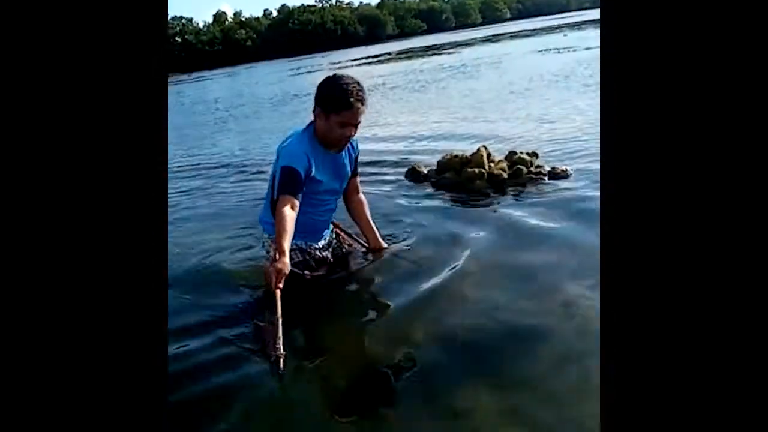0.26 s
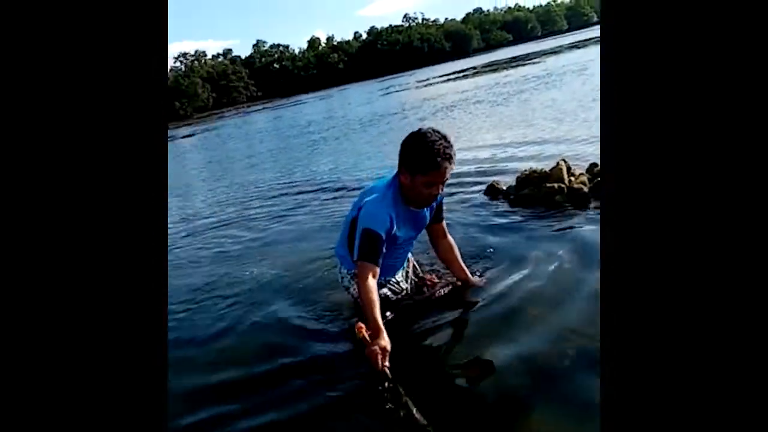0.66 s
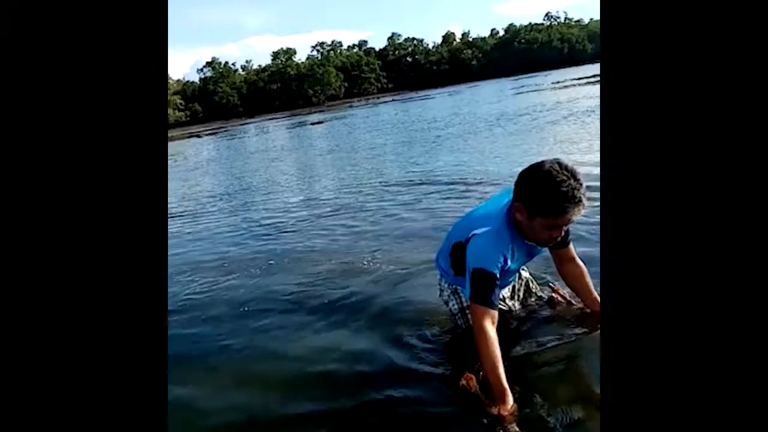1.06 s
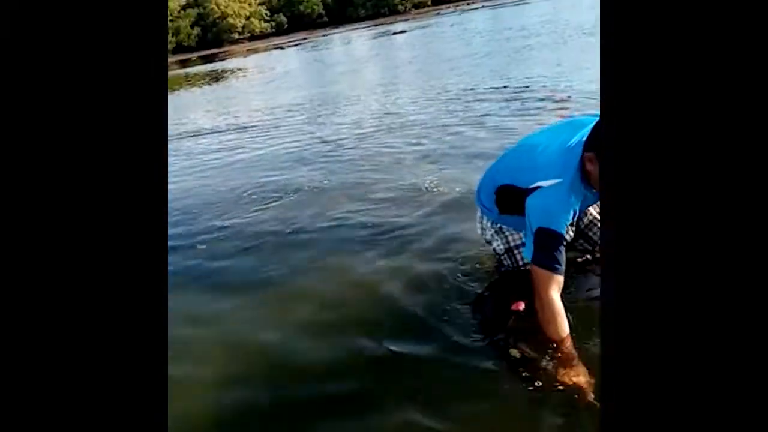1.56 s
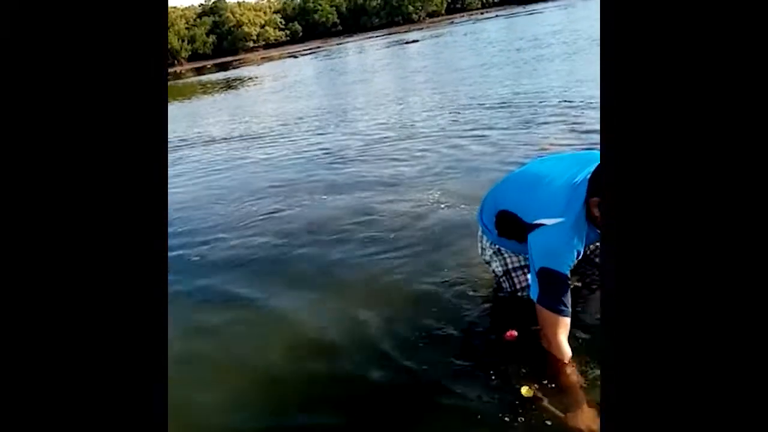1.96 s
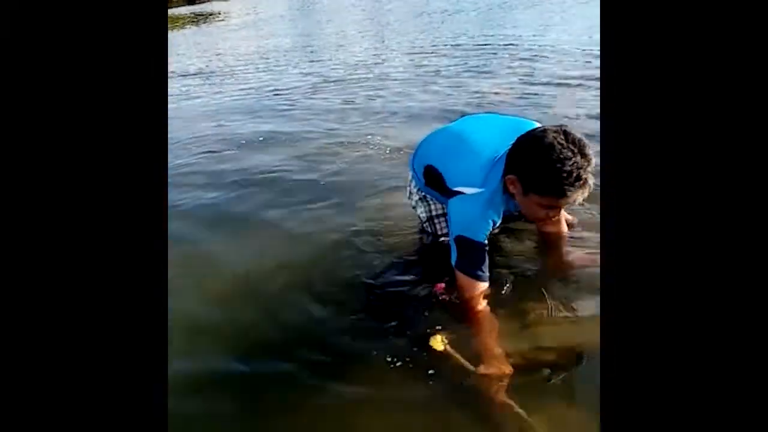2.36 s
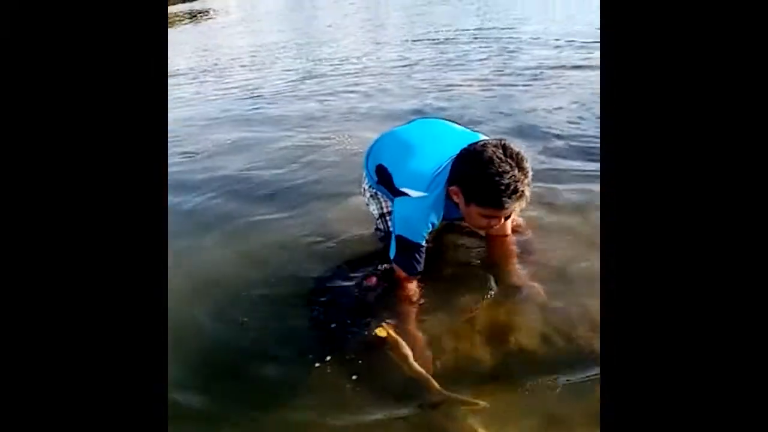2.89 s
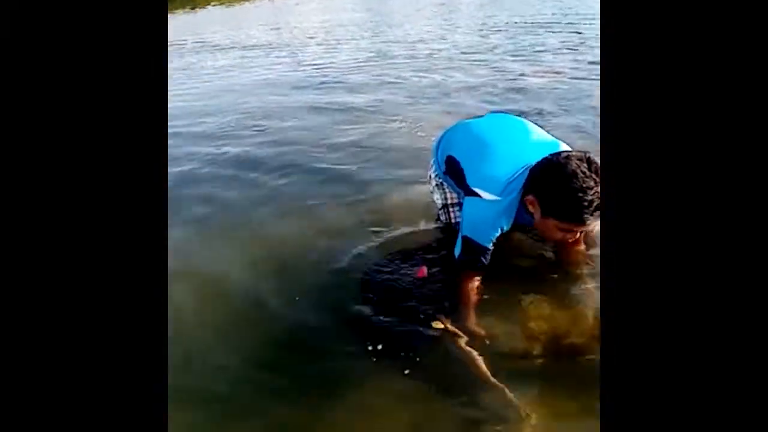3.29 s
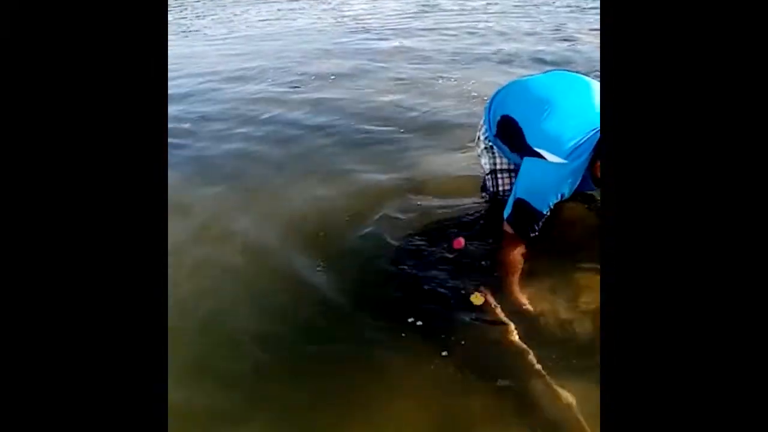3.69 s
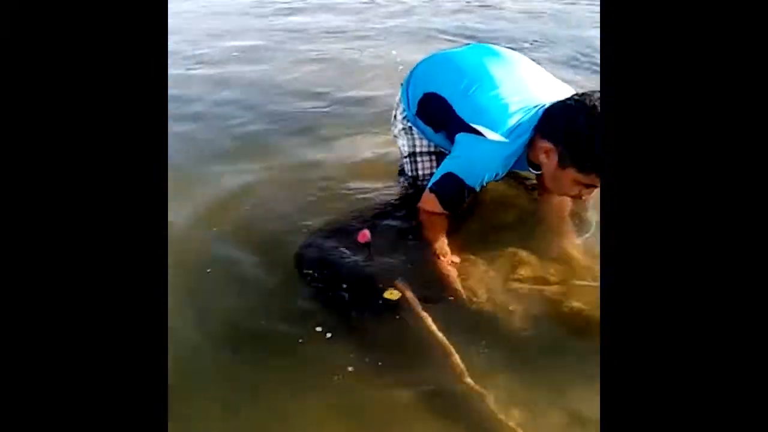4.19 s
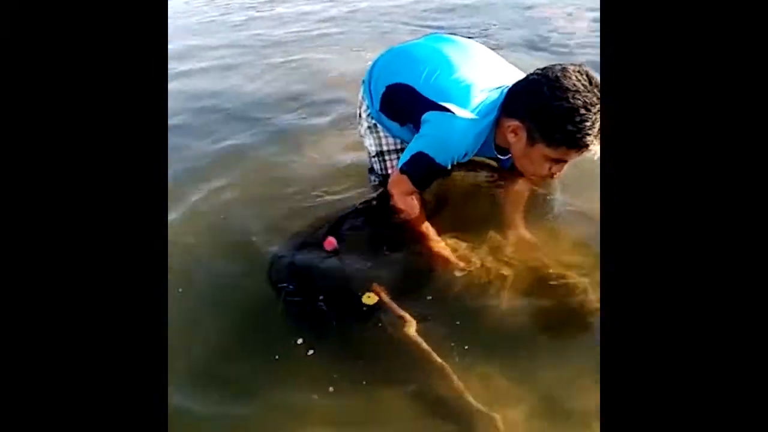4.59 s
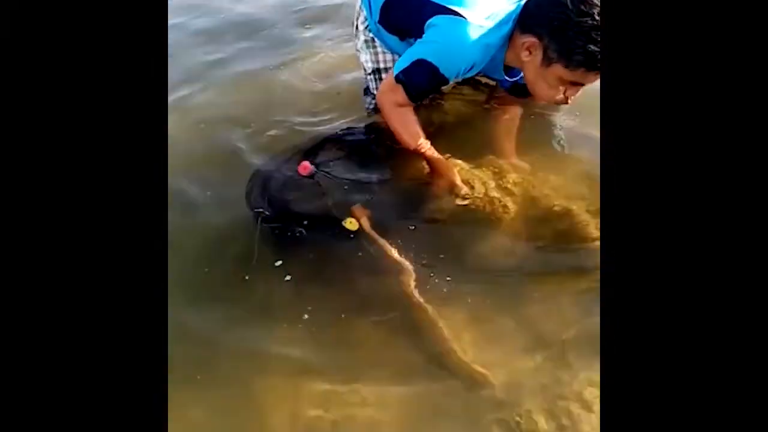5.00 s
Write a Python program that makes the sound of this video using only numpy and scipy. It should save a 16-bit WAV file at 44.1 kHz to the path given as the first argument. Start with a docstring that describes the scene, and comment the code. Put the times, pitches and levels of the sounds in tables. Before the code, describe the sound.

Outdoors on calm, shallow sea, with a soft, low bed of moving air and distant ripples. Wind buffets the microphone with low rumbles and thumps in the first 0.2 seconds, again lightly near 1.4 and 2.7. Close by on the right, someone wades: small swishes at the start, a bubbly slosh at 0.8 with drips and a hollow glug just after, then a couple of faint stone taps at 1.3. The strongest splash comes around 1.8 to 2.3, with fizz, bright drops and a cluster of rising bubble notes. It then quiets, with faint knocks near 3 and a short slosh at 3.4. From 3.6 onward stones clack sharply underwater, one after another, while pebbles grate and sandy grit hisses in uneven scoops, fullest from 4.2 to 5. Dull slaps and hollow gulps fall among them. A last knock and fading gravel end it.

```python
"""Someone wades in calm, waist-deep sea, then bends and scoops stones into a net under the surface.
Strokes of arms and legs stir up clouds of ringing bubbles, fizz and drips. Stones clack as short noise
bursts with a ring, gravel grates in dense clicks, and water gulps over the stones with a slap and a hollow note.
All this is close by on the right, over a soft bed of moving air and far ripples, while a light breeze
buffets the microphone ports with rumble and thumps."""
import sys
import numpy as np
from scipy import signal
from scipy.fft import rfft, irfft, next_fast_len
from scipy.io import wavfile
from scipy.ndimage import uniform_filter1d

SR = 44100
rng = np.random.default_rng(int(sys.argv[2]) if len(sys.argv) > 2 else 0)


def int16_out(signal):
    """Quantize to a 16-bit WAV file."""
    q = np.round(np.clip(np.atleast_2d(signal).T, -1, 1) * 32767)
    wavfile.write(sys.argv[1], SR, q.astype(np.int16))


N = 231432
TIME = np.arange(N) / SR

# Limbs or their wakes pushing through the water. Each row: time of the height in seconds, spray level
# in dB, gurgle level in dB (both before the lift in slosh), swell in seconds, settling in seconds.
STROKES = [(0.01, -61.5, -59, 0.09, 0.048), (0.14, -57, -68, .045, .035), (0.48, -66, -90, 0.36, 0.26),
           (0.801, -50, -53.5, 0.14, 0.22), (1.13, -60, -72, 0.16, 0.22), (1.74, -59.5, -79, 0.094, 0.075),
           (1.992, -43, -50, 0.12, 0.16), (2.209, -48.5, -54, 0.065, 0.078), (2.99, -60.5, -65, 0.59, 0.13),
           (3.179, -56, -63.5, 0.03, .09), (3.378, -47.5, -61, 0.076, 0.15)]
# Stones knocking together. Each row: time in seconds, peak in dB before a 6.5 dB lift, ring in Hz,
# treble in dB before a 14 dB lift.
KNOCKS = [(1.3031, -39, 1570, -32), (1.3631, -38, 1550, -18), (2.801, -39.5, 1510, -22.5),
          (3.0025, -38.5, 1530, -11), (3.1767, -38.5, 2150, -10.5), (3.235, -39, 2110, -13),
          (3.4164, -34, 1660, -18), (3.5818, -21, 1800, -15.5), (3.6215, -32, 1610, -4),
          (3.6646, -34.5, 1650, -32), (3.7185, -34, 1880, -4), (3.7967, -32.5, 1740, -10),
          (3.8288, -29.5, 1750, -19), (3.8383, -22, 1990, -21), (3.9048, -31, 1490, -11),
          (3.927, -26, 1600, -26.5), (3.9436, -24.5, 1400, -51), (4.064, -27, 1590, -14.5),
          (4.146, -33, 1700, -27), (4.1816, -22.5, 1350, -50), (4.2091, -25, 1500, -22),
          (4.255, -29.5, 1710, -10), (4.3076, -29.5, 1470, -10.5), (4.349, -27, 1480, -17),
          (4.4485, -29.5, 2040, -15), (4.4929, -22.5, 1360, -16.5), (4.6186, -24, 1750, -18.5),
          (4.6663, -30.5, 1770, -24.5), (4.7062, -20.5, 1660, -14.5), (4.7648, -20.5, 1710, -17.5),
          (4.8349, -24.5, 1590, -20.5), (4.8699, -30.5, 1720, -13.5), (4.9006, -23, 1610, -13.5),
          (5.0437, -18.5, 1740, -18.5), (5.2424, -30.5, 1710, -25)]


def from_db(db):
    """Turn decibels into gain."""
    return 10 ** (np.asarray(db) / 20)


def rms_one(x):
    """Scale to rms 1."""
    return x / np.sqrt(np.mean(x ** 2) + 1e-20)


def colour(x, spectrum):
    """Filter with the given spectrum, with no sound ahead of its cause (minimum phase)."""
    size = next_fast_len(x.shape[-1] + 2048, True) * 2
    hz, db = np.transpose(spectrum)
    grid = np.maximum(np.fft.rfftfreq(size, 1 / SR), 1)
    curve_db = np.interp(np.log(grid), np.log(hz), db)
    # folding the cepstrum forward gives the filter its minimum phase
    cepstrum = irfft(np.log(from_db(curve_db)))
    cepstrum[1:size // 2] *= 2
    cepstrum[size // 2 + 1:] = 0
    response = np.exp(rfft(cepstrum))
    return irfft(rfft(x, size) * response)[..., :x.shape[-1]]


def evened(x, window_s):
    """Hold the running rms near 1, leaving the fast grain."""
    power = np.mean(np.atleast_2d(x) ** 2, axis=0)
    width = max(int(window_s * SR), 1)
    smooth = uniform_filter1d(uniform_filter1d(power, width), width)
    return x / np.sqrt(np.abs(smooth) + 1e-6 * power.mean())


def add(out, s, wave):
    """Mix a short sound into one channel at time s."""
    start = int(np.clip(round(s * SR), 0, N))
    out[start:start + len(wave)] += wave[:N - start]


def scatter(times, waves):
    """Each sound comes from its own spot on the water, so it reaches the left port with its own small lead."""
    lead_s, lead_spread_s = .00055, .00007
    out = np.zeros((2, N))
    for s, wave, spot in zip(times, waves, rng.standard_normal(len(times))):
        add(out[0], s - lead_s + lead_spread_s * spot, wave)
        add(out[1], s, wave)
    return out


def grains(per_s, spread_db):
    """Random moments and sizes: many small, a few large."""
    when, chance = rng.random((int(per_s * N / SR), 2)).T
    sizes = from_db(spread_db * np.minimum(-np.log(1 - chance), 4))
    return when * N / SR, sizes


def bubble(hz, t60, rise):
    """A pinched-off bubble rings; its pitch shifts by the share rise within t60, the time to fade by 60 dB."""
    t = TIME[:int(t60 * SR) + 2]
    cycles = hz * (t + rise * t * t / (2 * t60))
    fade = np.exp(-np.log(1000) * t / t60)
    onset = 1 - np.exp(-2 * cycles)
    return np.sin(2 * np.pi * cycles) * fade * onset


def bubble_cloud(per_s, spread_db, centre_hz, octaves, cycles, rise):
    """Random bubbles around a fixed or moving centre pitch, each ringing for some cycles."""
    times, sizes = grains(per_s, spread_db)
    centres = np.interp(times, TIME, centre_hz + 0 * TIME)
    pitches = centres * 2 ** (octaves * rng.uniform(-0.961, 1, len(times)))
    return scatter(times, [size * bubble(hz, cycles / hz, rise) for size, hz in zip(sizes, pitches)])


def crackle(per_s, spread_db):
    """Random sharp ticks of noise, each dying away within about a millisecond."""
    times, sizes = grains(per_s, spread_db)
    length = SR // 300
    ticks = rng.standard_normal((len(times), length)) * np.exp(-TIME[:length] / .0006)
    return scatter(times, sizes[:, None] * ticks)


def surges(rows):
    """Joint gain of surges (s, dB, swell s, settling s): each swells like a bell curve, then dies away."""
    power = np.full(N, 1e-14)
    for s, db, swell_s, settle_s in rows:
        fall = (np.minimum(TIME - s, 0) / swell_s) ** 2 + np.maximum(TIME - s, 0) / settle_s
        power += from_db(db) ** 2 * np.exp(-2 * np.minimum(fall, 20))
    return np.sqrt(power)


def port_gains(pan_db):
    """Left and right gains of constant total power."""
    gains = from_db(np.array([pan_db, -pan_db]) / 2)
    return gains / np.sqrt(np.mean(gains ** 2, axis=0))


def spray_level():
    """Spray follows the strokes, over faint ripples."""
    ripple_db = -73.5
    strokes = surges([(s, db, swell_s, settle_s) for s, db, _, swell_s, settle_s in STROKES])
    return np.hypot(strokes, from_db(ripple_db))


def pocket_pitch():
    """Air pockets are largest, so lowest, shortly after a strong stroke; weak strokes trap no large ones."""
    rest_hz, dip_octaves, strong_db = 1170, 1.65, -51
    deepest_s, dip_s = .16, 0.0846   # delay after the stroke, and half width of the dip
    depth = 0
    for s, db, *_ in STROKES:
        strength = min(from_db(db - strong_db), 1)
        depth = depth + strength * np.exp(-((TIME - s - deepest_s) / dip_s) ** 2)
    return rest_hz * 2 ** (-dip_octaves * depth)


def slosh(spray):
    """Limbs fold large pockets of air under; the broken surface spatters and fizzes over a wash of foam."""
    # Tone of the broken surface. Each row: frequency in Hz, level in dB.
    spray_tone = [(530, -14.5), (900, 3), (1310, -6), (1650, -3), (2210, -1), (3330, -10.5), (4330, -6),
                  (6420, -5), (10000, -17), (13000, -64), (22000, -120)]
    # Tone of the finest bubbles, all that gentle stirring frees. Each row: frequency in Hz, level in dB.
    fine_fizz = [(1500, -3), (4500, 1)]
    full_spray_db = -48.5   # from this spray level up the fizz has its whole body
    gurgle_lag_s = 0.034   # the air comes up after the spray
    air = surges([(s + gurgle_lag_s, db, swell_s * 0.86, settle_s * 1.16)
                  for s, _, db, swell_s, settle_s in STROKES])
    gurgle = bubble_cloud(per_s=260, spread_db=9.0, centre_hz=pocket_pitch(), octaves=0.67, cycles=28.7, rise=0.24)
    bubbles = bubble_cloud(per_s=2200, spread_db=4.0, centre_hz=3250, octaves=1.727, cycles=52, rise=0.14)
    bubbles = colour(np.diff(bubbles, prepend=0), spray_tone)   # small bubbles radiate more sharply
    spatter = colour(crackle(per_s=330, spread_db=4.5), spray_tone)
    foam = rms_one(colour(rng.standard_normal((2, N)), spray_tone))
    fizz = 0.78 * evened(bubbles, 0.092) + 0.64 * evened(spatter, 0.32) + 0.43 * foam
    fullness = np.minimum(spray / from_db(full_spray_db), 1)
    fizz = fullness * fizz + (1 - fullness) * colour(fizz, fine_fizz)
    return from_db(7.0) * air * evened(gurgle, 0.053) + from_db(6.0) * spray * fizz


def open_air():
    """Moving air and far ripples are steady coloured noise, separate in each port."""
    # Tone of the air and the far sea. Each row: frequency in Hz, level in dB.
    sea_tone = [(18, -40), (30, -2), (111, 12), (168, 5), (333, -9.5), (798, -15), (1430, -30), (1780, -34),
                (2330, -32), (4820, -35.5), (10000, -33.5), (13000, -73), (22000, -120)]
    level_db = -54.5
    hush = rms_one(colour(rng.standard_normal((2, N)), sea_tone))
    return from_db(level_db) * hush * port_gains(pan_db=-1.5)[:, None]


def wind():
    """Each port has its own lumpy rumble that comes in puffs; a strong eddy gives a thump of a cycle or two."""
    # Puffs of breeze on the ports. Each row: middle in seconds, rms in dB before a 9 dB lift,
    # half length in seconds, left over right in dB.
    puffs = [(0.05, -39, 0.05, -5.5), (0.139, -38, 0.017, 14), (0.612, -50, 0.028, -5.5),
             (0.832, -53.5, 0.082, -9), (1.387, -46.5, 0.043, 35), (1.651, -49.5, 0.033, 1.5),
             (1.845, -47.5, 0.052, -32), (2.741, -47, 0.075, 28), (3.718, -52, 0.068, 20),
             (4.92, -43, 0.036, -35)]
    # Single eddies. Each row: start in seconds, peak in dB before a 6.5 dB lift,
    # pitch in Hz before it is scaled by 1.392, left over right in dB.
    eddies = [(0.036, -17.5, 159, -48), (0.076, -30.5, 150, 2), (0.196, -24, 129, -33),
              (1.355, -33.5, 127, 22), (2.632, -30.5, 146, 32), (2.722, -26, 147, 32)]
    # Tone of the rumble. Each row: frequency in Hz, level in dB.
    wind_tone = [(25, -32.5), (50, -8.5), (80, 3), (135, 2.5), (200, -7), (300, -16.5), (500, -30.5),
                 (900, -52.5)]
    noise = colour(rng.standard_normal((2, N)), wind_tone)
    rumble = np.array([evened(port, 0.067) for port in noise])
    power = np.full((2, N), 1e-18)
    for s, db, half_s, pan in puffs:
        gains = from_db(db + 9.0) * port_gains(pan)[:, None]
        power += gains ** 2 * np.exp(-((TIME - s) / half_s) ** 2)
    out = rumble * np.sqrt(power)
    for s, db, hz, pan in eddies:
        thump = from_db(db + 6.5) * bubble(hz * 1.392, t60=0.042, rise=-0.71)   # the pitch falls
        for port, gain in zip(out, port_gains(pan)):
            add(port, s, gain * thump)
    return out


def small_drops(spray):
    """Chance drops while wading, as strong as the spray that throws them: rows (s, dB, pitch Hz)."""
    drops_per_s, wading_ends_s = 7.2, 3.45
    over_spray_db, centre_hz, octaves = 13, 4310, 1.0
    when, size = rng.random((int(drops_per_s * wading_ends_s), 2)).T
    times = when * wading_ends_s
    db = 20 * np.log10(np.interp(times, TIME, spray)) + over_spray_db
    return list(zip(times, db, centre_hz * 2 ** (octaves * (2 * size - 1))))


def drips(spray):
    """A drop falling back gives a tick of impact together with the ring of a tiny bubble."""
    # The largest drops. Each row: time in seconds, peak in dB before a 5.8 dB lift, pitch in Hz.
    large_drops = [(0.3461, -44.5, 4664), (0.5672, -40, 2360), (0.6844, -41, 4400), (0.8036, -33.5, 6540),
                   (0.814, -34, 4440), (1.2424, -49, 4900), (1.7379, -37, 8340), (1.8022, -38, 1620),
                   (1.8208, -32.5, 6840), (1.864, -33, 5880), (1.8765, -31.5, 2290), (1.9898, -32, 2220),
                   (2.1005, -32.5, 4950), (2.2133, -32.5, 6580), (2.4015, -35, 5310), (3.0896, -45.5, 8500),
                   (3.3162, -42, 4370)]
    tick_db, tick_s = -2.5, .0019   # level beside the bubble, and decay time
    drops = large_drops + small_drops(spray)
    waves = []
    for (s, db, hz), noise in zip(drops, rng.standard_normal((len(drops), SR // 10))):
        ring = bubble(hz, t60=.015, rise=.14)
        t = TIME[:len(ring)]
        tick = from_db(tick_db) * noise[:len(ring)] * np.exp(-t / tick_s)
        onset = 1 - np.exp(-t / 0.00016)
        waves.append(from_db(db + 5.8) * (ring + tick) * onset)
    return scatter([row[0] for row in drops], waves)


def glugs():
    """Single large bubbles ring alone, rising in pitch."""
    # Each row: time in seconds, peak in dB before a 7 dB lift, pitch in Hz, time to fade by 60 dB in seconds.
    large_bubbles = [(0.69, -41, 924, 0.053), (0.86, -35, 880, 0.029), (0.932, -31.5, 309, 0.14),
                     (1.06, -28, 755, 0.012), (2.03, -32.5, 886, .036), (2.067, -31.5, 800, 0.038),
                     (2.091, -38.5, 750, 0.043), (2.118, -42, 298, 0.1), (2.197, -38.5, 730, 0.033),
                     (2.304, -38.5, 364, 0.038), (3.378, -33, 735, .032)]
    rise_per_s = 2.57   # pitch climbs at this share of itself per second
    waves = [from_db(db + 7.0) * bubble(hz, t60, rise=rise_per_s * t60) for s, db, hz, t60 in large_bubbles]
    return scatter([row[0] for row in large_bubbles], waves)


def contacts():
    """Each stone rebounds once, softer and duller, after a chance delay; rows are like those of KNOCKS."""
    shortest_s, longest_s = .007, 0.023
    softer_db, duller_db = -9.5, -0.5
    delays = shortest_s + (longest_s - shortest_s) * rng.random(len(KNOCKS))
    rebounds = [(s + delay, db + softer_db, hz, treble_db + duller_db)
                for (s, db, hz, treble_db), delay in zip(KNOCKS, delays)]
    return list(KNOCKS) + rebounds


def stones():
    """Submerged stones scrape for an instant, then clack with a brief ring, each with its own brightness."""
    # Tone of knocking stone. Each row: frequency in Hz, level in dB.
    stone_tone = [(530, -22.5), (900, -11.5), (1680, -2.5), (1990, -6.5), (2250, -10), (3330, -10),
                  (3730, -11.5), (4840, -8.5), (8510, -17), (10000, -24), (13000, -77), (22000, -120)]
    clack_attack_s, clack_decay_s = 0.00048, 0.0025
    scrape_db, scrape_swell_s, scrape_decay_s = -15.5, 0.0031, 0.0056
    lead_s = .008   # room for the scrape ahead of the clack
    hits = contacts()
    waves = []
    for (s, db, hz, treble_db), noise in zip(hits, rng.standard_normal((len(hits), SR // 16))):
        t = TIME[:len(noise)] - lead_s
        before, after = np.maximum(-t, 0), np.maximum(t, 0)
        clack = (1 - np.exp(-(after / clack_attack_s) ** 2)) * np.exp(-after / clack_decay_s)
        scrape = from_db(scrape_db) * np.exp(-before / scrape_swell_s - after / scrape_decay_s)
        body = [(hz * 0.65, 0), (hz, 5), (hz * 1.2, 0), (3600, treble_db + 14.0)]
        knock = colour(colour(noise * (clack + scrape), stone_tone), body)
        waves.append(from_db(db + 6.5) * knock / np.abs(knock).max())
    return scatter([row[0] - lead_s for row in hits], waves)


def catching():
    """Dragged gravel catches and slips, so its gain wanders between random levels."""
    catches_per_s, catch_db = 40, 2.5
    steps = rng.standard_normal(1000)
    return from_db(catch_db * np.interp(TIME * catches_per_s, np.arange(len(steps)), steps))


def gravel():
    """Pebbles grate in dense uneven clicks and shake tiny bubbles loose; sand hisses among them."""
    # Hands dragging gravel towards the net. Each row: time of the height in seconds, grating in dB
    # before a 1.5 dB lift, hiss in dB before a 6.5 dB lift, swell in seconds.
    scoops = [(3.67, -49.5, -53, 0.062), (4.002, -54, -52.5, 0.3), (4.231, -44.5, -47.5, 0.25),
              (4.418, -49.5, -49.5, 0.039), (4.682, -41, -47.5, 0.16), (4.888, -43, -46.5, 0.11),
              (5.1, -47, -54, 0.079), (5.25, -52, -54, 0.11)]
    # Tones of pebbles and of sand. Each row: frequency in Hz, level in dB.
    pebble_tone = [(150, -62), (250, -0.5), (301, 1.5), (809, -6.5), (880, -9), (1090, 1), (1800, 2),
                   (3000, -2.5), (3900, -67), (6600, -120)]
    sand_tone = [(1470, -43), (2500, 1.5), (4220, -4), (4810, 2), (6380, 0), (7870, -6), (8510, -3.5),
                 (9890, -12), (10500, -27), (13600, -73), (22000, -120)]
    scoop_settle_s = 0.1
    # every knock sets the gravel around it sliding; levels are relative to the knock's table level
    slide_grating_db, slide_hiss_db, slide_swell_s, slide_settle_s = -18.5, -23, 0.0038, 0.031
    slides = surges([(s, db, slide_swell_s, slide_settle_s) for s, db, _, _ in KNOCKS])
    grating = surges([(s, db, swell_s, scoop_settle_s) for s, db, _, swell_s in scoops])
    hiss = surges([(s, db, swell_s, scoop_settle_s) for s, _, db, swell_s in scoops])
    clicks = evened(crackle(per_s=350, spread_db=4.0), 0.2)
    grit = evened(crackle(per_s=3200, spread_db=1.5), 0.18)
    blips = bubble_cloud(per_s=350, spread_db=4.0, centre_hz=1478, octaves=0.98, cycles=32, rise=.1)
    pebbles = rms_one(colour(clicks + .5 * grit, pebble_tone)) + .8 * evened(colour(blips, pebble_tone), .07)
    sand = rms_one(colour(0.69 * clicks + grit, sand_tone))
    uneven = catching()
    pebble_level = np.hypot(from_db(1.5) * uneven * grating, from_db(slide_grating_db) * slides)
    sand_level = np.hypot(from_db(6.5) * uneven * hiss, from_db(slide_hiss_db) * slides)
    return pebble_level * pebbles + sand_level * sand


def burst(noise, spectrum, attack_s, decay_s, tail_db, tail_s):
    """A rough contact: a quick rush of noise and a weak tail, in a body's colour; peak 1."""
    t = TIME[:len(noise)]
    onset = 1 - np.exp(-(t / attack_s) ** 2)
    fade = np.exp(-t / decay_s) + from_db(tail_db) * np.exp(-t / tail_s)
    wave = colour(noise * onset * fade, spectrum)
    return wave / np.abs(wave).max()


def gulps():
    """The water closes over a shifted stone with a slap; the duller the slap, the fuller its hollow note."""
    # Each row: time in seconds, slap peak in dB before a 0.5 dB cut, brightness in dB before a 15.5 dB lift.
    closings = [(2.722, -33.5, -16.5), (2.8, -38.5, -13), (2.899, -39.5, -11), (3.002, -39.5, -14.5),
                (3.239, -37.5, -10), (3.584, -21.5, 25), (3.68, -27, -7), (3.836, -28, 1),
                (3.905, -33.5, -14), (4.068, -26, -16.5), (4.148, -37.5, -7), (4.182, -30.5, -17),
                (4.267, -43, -31), (4.357, -27.5, -16.5), (4.496, -28.5, -17.5), (4.615, -32.5, -3),
                (5.224, -24.5, -5)]
    # Tone of the slap. Each row: frequency in Hz, level in dB.
    slap_tone = [(120, -39.5), (220, -21), (320, 0.5), (480, -5.5), (650, -8.5), (820, -7.5), (1050, -14.5),
                 (1500, -24), (2500, -107)]
    slaps, notes = [], []
    for (s, db, bright_db), noise in zip(closings, rng.standard_normal((len(closings), SR // 10))):
        slap = burst(noise, slap_tone, attack_s=.0007, decay_s=.0045, tail_db=-16, tail_s=.016)
        slap = colour(slap, [(380, 0.0046), (620, bright_db + 15.5)])
        slaps.append(from_db(db - 0.5) * slap / np.abs(slap).max())
        chance_hz = 320 * (1 + .08 * noise[0])
        note = bubble(chance_hz, t60=.07, rise=-.11)   # the pitch sinks
        notes.append(from_db(db - 12 - .5 * bright_db) * note)
    times = np.array(closings)[:, 0]
    return scatter(times, slaps) + scatter(times + 0.0021, notes)


def scene():
    """Close water sounds from the right, moving air and far ripples all round, puffs of wind on the ports."""
    # How the muffled left port dulls the close sounds. Each row: frequency in Hz, level in dB.
    left_shade = [(200, -6), (650, -3.5), (1300, -10), (2500, -11), (5000, -10.5), (10000, -15)]
    spray = spray_level()
    water = slosh(spray) + drips(spray) + glugs()
    left, right = water + stones() + gravel() + gulps()
    close = np.array([colour(left, left_shade), right])
    return close + open_air() + wind()


def record(dry):
    """A steep low-pass filter cuts off the top of the treble."""
    cutoff_hz = 10400
    low_pass = signal.ellip(10, .2, 70, cutoff_hz, fs=SR, output="sos")
    return signal.sosfilt(low_pass, dry)


dry = scene()
out = record(dry)
int16_out(out)
```